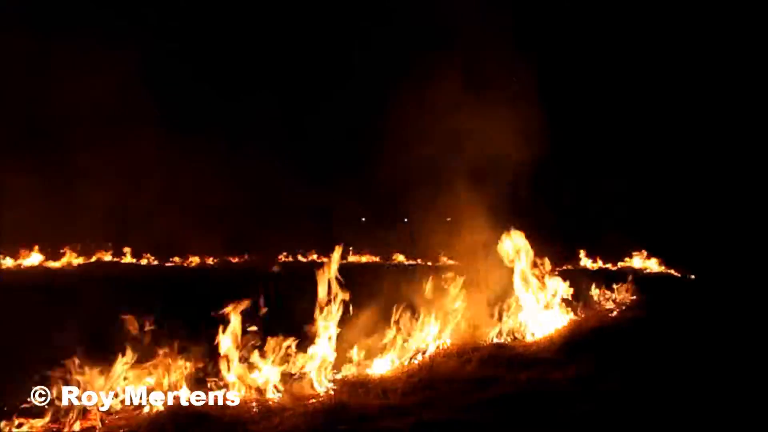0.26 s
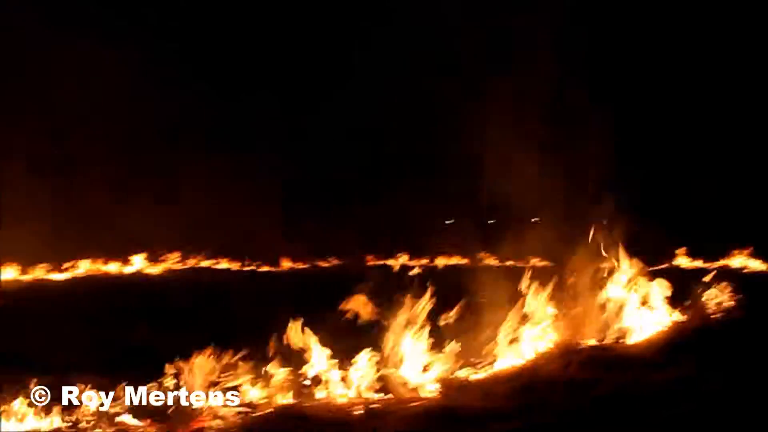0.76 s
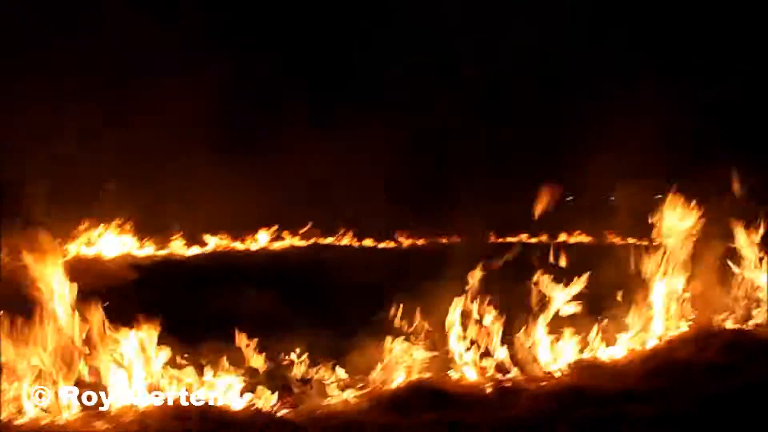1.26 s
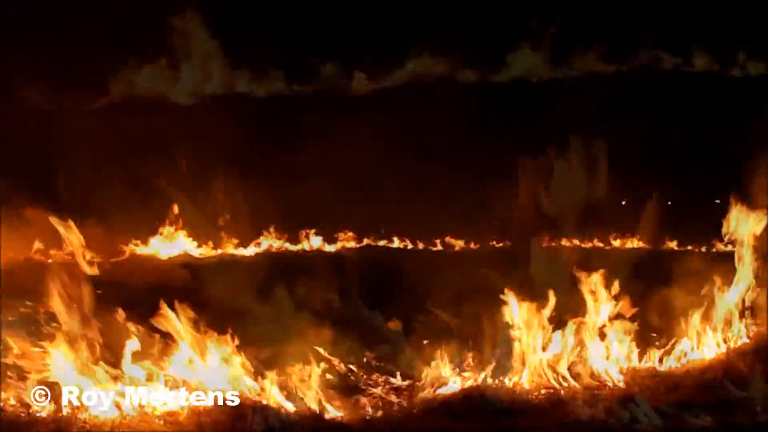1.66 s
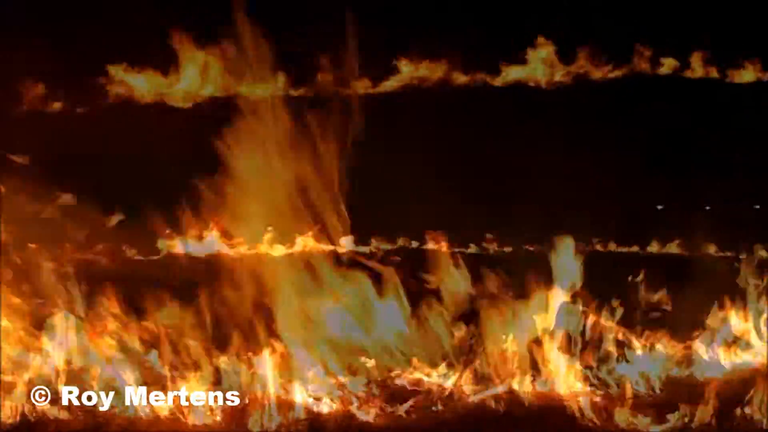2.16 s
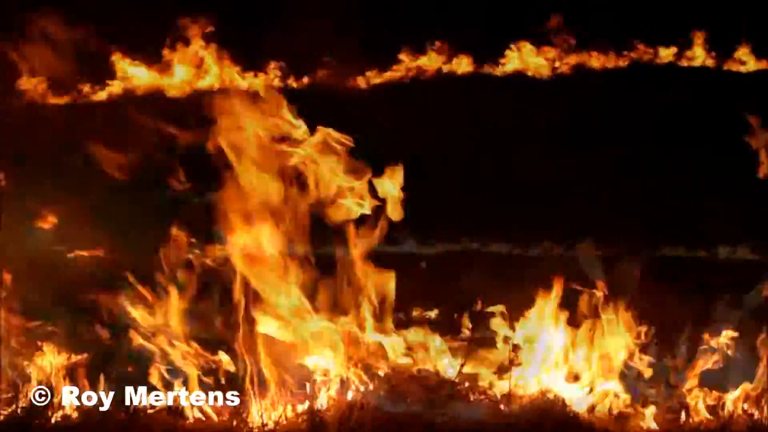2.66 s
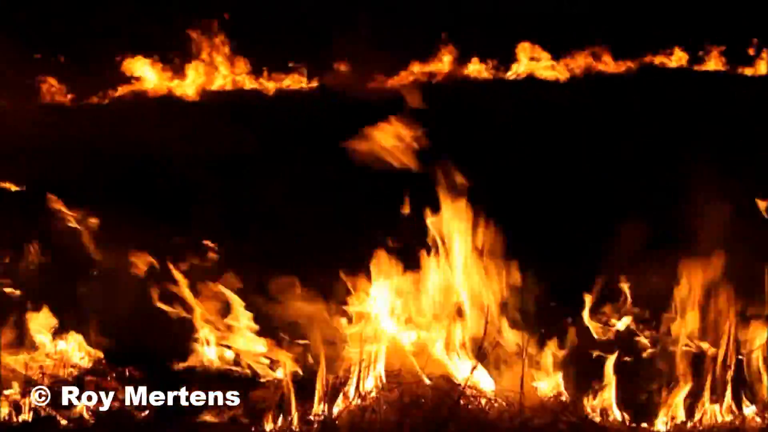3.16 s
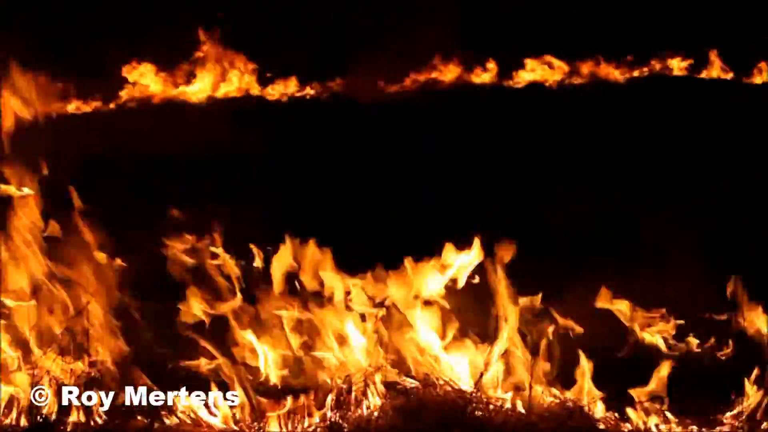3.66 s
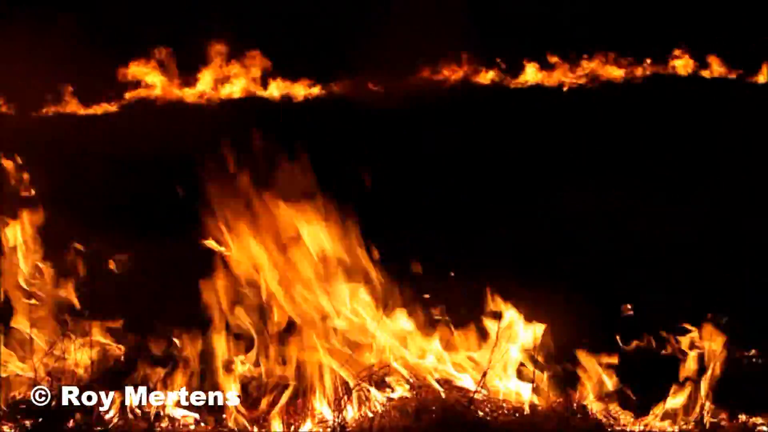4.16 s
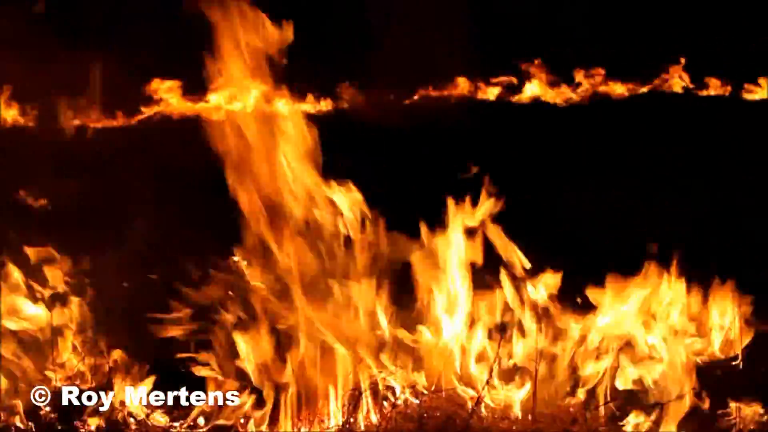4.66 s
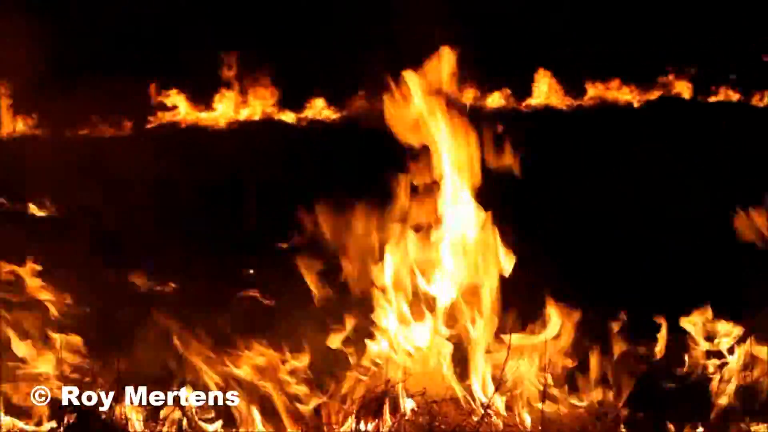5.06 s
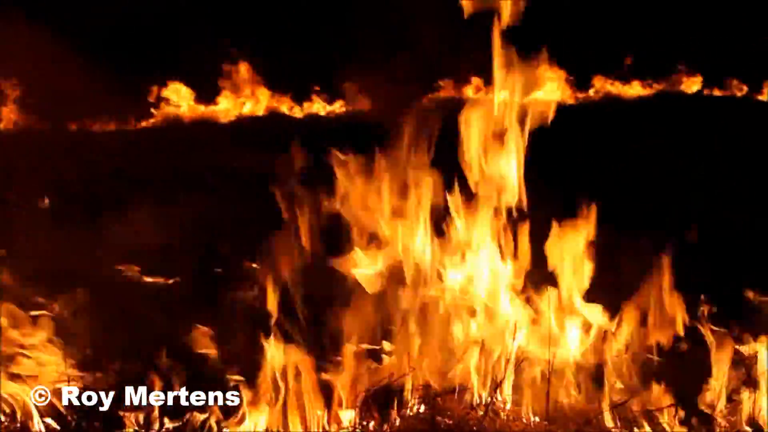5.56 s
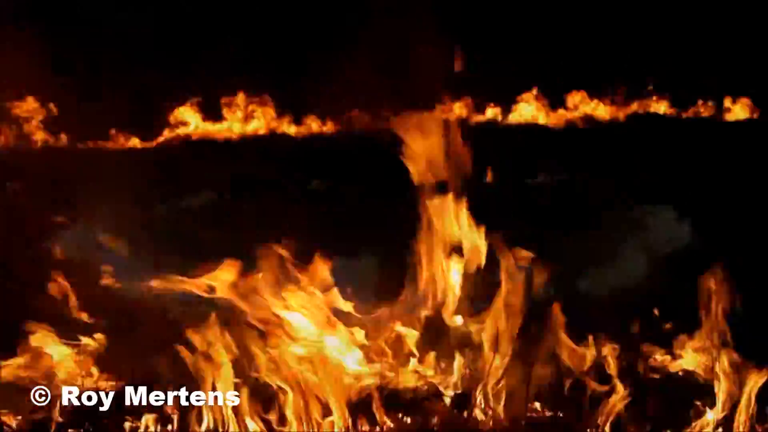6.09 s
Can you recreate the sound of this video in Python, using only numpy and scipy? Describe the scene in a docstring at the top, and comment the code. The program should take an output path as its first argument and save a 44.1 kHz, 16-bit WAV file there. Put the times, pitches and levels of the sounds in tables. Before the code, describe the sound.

A grass fire outdoors at night, heard close and nearly dry. Countless tiny ticks crowd in irregular flurries, with stems bursting as hollow pops and bright splintering snaps. The opening is lighter, the middle dense and fierce, then the sizzle thins while cracks continue. The last fraction of a second jumps up in level, with heavier crackle, a soft puff, rumble and low hum.

```python
"""A dense crackle of small blades opens at once, over the hiss of a far fire line and the low rumble of flames:
dry grass burning in a field, close by. Stems burst over it in sharp cracks that splinter for a few milliseconds.
Breaks are noise tears around a spike, ringing resonances; hiss, rumble and soft puffs are coloured noise.
The strength of the fire drives crackle, hiss and lesser cracks. Near the end the sound cuts to a louder,
deeper-toned view of the fire, with a low, wavering sine hum."""
import sys
import numpy as np
from scipy import signal
from scipy.fft import rfft, irfft, next_fast_len
from scipy.io import wavfile
from scipy.ndimage import map_coordinates

SR = 44100
rng = np.random.default_rng(int(sys.argv[2]) if len(sys.argv) > 2 else 0)


def file_out(sig):
    """Save sig as 16-bit WAV at sys.argv[1]."""
    # one column per channel
    cols = np.atleast_2d(sig).T
    # limit, then scale
    lim = np.clip(cols, -1, 1)
    pcm = np.round(lim * 32767).astype(np.int16)
    wavfile.write(sys.argv[1], SR, pcm)


N = 279153

# strength of the fire, the base level for its layers before the gain of the cut: start_s, level_db
FIRE_STRENGTH = [(0.0, -41.5), (0.46, -42), (0.66, -37.5), (0.82, -41), (1.27, -41), (1.49, -38),
                 (1.505, -31), (1.76, -33), (2.4, -31), (2.88, -29), (3.0, -32.5), (3.7, -34),
                 (4.25, -36.5), (4.66, -36), (4.9, -34), (5.33, -34), (5.8, -39), (6.33, -37.5)]
# colour of the far hiss, relative level per Hz: edge_hz, level_db
HISS_SPECTRUM = [(150, -32), (420, 2.5), (900, -4), (2000, -0.5), (4000, -4), (8000, -7), (12500, -4.5),
                 (16000, -1.5)]
# colour of the flame rumble, relative level per Hz: edge_hz, level_db
RUMBLE_SPECTRUM = [(20, -21), (45, -6), (90, 0), (170, 1), (250, -1.5), (330, -6.5), (430, -5),
                   (700, -10.5), (1200, -22), (4000, -67)]
# draught of the flames, the rumble level before the gain of the cut: start_s, level_db
FLAME_DRAUGHT = [(0.0, -59), (1.4, -58.5), (1.55, -52), (2.85, -47.5), (3.1, -53), (4.25, -54),
                 (4.6, -50.5), (5.5, -53.5), (5.9, -55.5)]
# loudest bursting stems, levels before the trims in bursting():
# start_s, pitch_hz (hollow stem), stem_db, snap_db (bright fracture), tail_db (splinters relative to the burst)
NEAR_STEMS = [(0.0087, 2510, 0.5, -7, -16.5), (0.0265, 625, -0.5, 7.5, -22), (0.1442, 3000, 6, 2.5, -19.5),
              (0.1577, 5200, 4, 1, -3), (0.375, 5330, -1.5, -14, -13), (0.403, 3350, 0, -6, -3),
              (0.5931, 815, 1.5, 1, -5), (0.6167, 2700, 5.5, 6, -19), (0.635, 3170, 0.5, -11, -19),
              (0.7122, 2440, 3.5, 8.5, -22), (0.756, 3530, -5, -3, -5), (0.7916, 3840, -2, -7, -20),
              (0.8305, 5000, 7, 4.5, -33), (1.0598, 720, -0.5, 6.5, -11), (1.099, 2860, -11, -5, -21),
              (1.1759, 540, -2, -5, -16), (1.25, 2510, -2.5, -2.5, -5), (1.3333, 4610, -0.5, -2, -18),
              (1.349, 2630, 5.5, 7.5, -8), (1.505, 646, 2.5, 2, -8), (1.5493, 2520, 3.5, 5, -3),
              (1.5818, 2070, 4.5, 9, -6), (1.639, 1880, 15, 13.5, -23), (1.6968, 900, 9, 16, -28),
              (1.7495, 3460, 2, -11, -9), (1.8191, 4550, 10.5, 0, -12), (1.9, 5000, 4.5, 6.5, -20),
              (1.9909, 2120, -3, 11.5, -24), (2.0052, 5470, 9.5, -2, -11), (2.134, 3320, 5.5, 6, -23),
              (2.1576, 1340, 0, 7, -16), (2.2099, 4190, 10.5, 6.5, -3), (2.249, 640, -14, 11, -20),
              (2.3652, 2200, 6, -8, -15), (2.6013, 2100, 7, 5, 3.5), (2.6134, 1630, 12, -2, -11),
              (2.6609, 3330, 11, 8, -8), (2.6653, 640, 1, 4, -1), (2.706, 1250, 12, 8, -16),
              (2.7227, 2420, 6.5, 5.5, -22), (2.7959, 4040, 7.5, 8, -26), (2.8037, 620, -2, 9, -15),
              (2.9011, 1310, 8.5, 3, 4), (2.9068, 5130, 5, 8, -14), (2.9112, 3830, 11.5, 10, -15),
              (3.047, 820, -1, 7, -3), (3.073, 2930, 5, 7.5, -27), (3.107, 8960, 12.5, 12, -28),
              (3.214, 3510, 7, 4, -24), (3.295, 1440, -8, 7.5, -8), (3.3305, 800, 0, 4.5, 6.5),
              (3.3468, 5340, 11, 3, -11), (3.3922, 3000, 9.5, 6, -19), (3.4585, 540, 1, 15, -24),
              (3.4827, 740, 2, 12.5, -14), (3.518, 770, 9, 12, -14), (3.539, 1450, 20, 3, -14),
              (3.554, 3000, 2, 3, 1), (3.579, 8210, 12.5, 1, -20), (3.6441, 4220, 0.5, 0, -10),
              (3.78, 1630, 4.5, 9, -18), (3.9002, 1040, 13, 6.5, -5), (3.9222, 1730, 3, 8, -16),
              (3.9444, 2830, 7, 9.5, -6), (4.0056, 1920, 5.5, 6.5, -8), (4.0536, 2330, 8, 14.5, -12),
              (4.0684, 1060, 1, 11, -10), (4.073, 830, -1, 7, -16), (4.1095, 1000, -3, 5.5, -21),
              (4.1234, 2400, 10.5, -4, -28), (4.1752, 3040, 4, 5, -4), (4.2469, 1620, 3.5, -20, -17),
              (4.3225, 970, 3, 7, 1.5), (4.355, 2780, -5, 3, -18), (4.372, 2570, 14.5, -19, -29),
              (4.4631, 1900, -1.5, 4.5, -10), (4.5216, 1870, 2.5, 6, 0), (4.5392, 1650, 3, -5, -11),
              (4.6935, 730, -9, 2, -17), (4.7388, 2610, -1, 4, -18), (4.8058, 3400, 7.5, 6.5, -20),
              (4.8288, 5370, 5, 7, -18), (4.8424, 1460, 11.5, 3, -10), (4.8532, 4770, 7, 8.5, -8),
              (4.9324, 2600, 4, 2.5, -17), (4.995, 1200, 5, 0, -2), (5.0649, 7040, 10, 1, -11),
              (5.1249, 2340, 10, -3, -10), (5.2361, 1990, 4.5, 4, -4), (5.283, 1930, 5, 8, -1.5),
              (5.3045, 550, -9, 9.5, -25), (5.3147, 1070, 8, 6, -11), (5.4039, 1900, -2, 3, -20),
              (5.4414, 1940, -0.5, -3, -8), (5.487, 3330, -0.5, 3.5, 3), (5.6188, 910, -6, 4.5, -7),
              (5.654, 1990, 2.5, 0, -21), (5.6974, 1290, -12, 6, -7), (5.7627, 1900, -9, -6, -19),
              (5.8745, 2660, 3, 11.5, -28), (5.9189, 4460, -2.5, -2, -21), (6.0343, 2340, 12.5, 13, -17),
              (6.1223, 2930, 12, -14, -19), (6.1453, 3020, 13.5, -10, -18), (6.196, 1950, 8, 0, 3.5),
              (6.2398, 2420, 10, -5, -20), (6.2612, 2600, 9, -13.5, -16), (6.2864, 3160, 10, 2, -9.5)]
# soft puffs of flaring gas: start_s, edge_hz (upper edge), level_db, length_s
GAS_PUFFS = [(4.56, 845, -39, 0.021), (5.997, 380, -34.5, 0.048)]

TIME = np.arange(N) / SR
TOP_HZ = 16000  # upper band limit
LEAD = SR // 1000  # samples of tearing ahead of each spike, about 1 ms
CUT_S, CUT_FADE_S = 5.995, 0.012  # when the view changes, and the length of the fade into it
CUT_DB, CUT_STALKS_DB, CUT_RUMBLE_DB = 8, 4, 15  # gain of the fire, extra for thick stalks, gain of the rumble
USUAL_DB = -33.5  # strength of the fire that leaves the lesser cracks neither boosted nor cut


def amp(db):
    """Decibels to gain."""
    return 10 ** (np.asarray(db) / 20)


def unit(x):
    """x at rms 1."""
    return x / np.sqrt(np.mean(x ** 2) + 1e-20)


def curve(rows):
    """Straight lines through (start_s, level_db) points, one value per sample."""
    return np.interp(TIME, *np.transpose(rows))


def wobble(rate):
    """A smooth random curve, rate knots a second."""
    return map_coordinates(rng.standard_normal(2048), [TIME * rate], mode="wrap")


def filtered(x, response):
    """x times a response of frequency."""
    size = next_fast_len(N + SR // 2)
    hz = np.fft.rfftfreq(size, 1 / SR)
    return irfft(rfft(x, size) * response(hz), size)[:N]


def noise(spectrum):
    """Noise of rms 1 with the given (edge_hz, level_db) colour."""
    edge_hz, level_db = np.transpose(spectrum)
    colour = lambda hz: amp(np.interp(np.log(hz + 1), np.log(edge_hz), level_db))
    return unit(filtered(rng.standard_normal(N), colour))


def resonance(hz, centre, q):
    """A damped resonance with gain 1 at its centre."""
    return 1j * hz * centre / (q * (centre ** 2 - hz ** 2) + 1j * hz * centre)


def fractures(tail_db, spike_db, tear_s, splinter_s, size=768):
    """One row per break: a tearing that swells to a pressure spike and dies, then sparse splinters."""
    t = (np.arange(size) - LEAD) / SR
    draw = rng.standard_normal((len(tail_db), 2, size))
    norm = lambda rows: rows / np.linalg.norm(rows, axis=1, keepdims=True)
    # the tear swells twice as fast as it dies
    tear = norm(draw[:, 0] * np.exp(np.minimum(2 * t, -t) / tear_s))
    # cubing the noise leaves a few strong grains
    splinters = norm(draw[:, 1] ** 3 * np.maximum(t, 0) * np.exp(-t / splinter_s))
    burst = norm(amp(spike_db) * (t == 0) + tear)
    return burst + amp(tail_db)[:, None] * splinters


def rung(breaks, pitch_hz, q, low_hz):
    """Each break rings its own resonance; so small a source radiates little bass."""
    hz = np.fft.rfftfreq(breaks.shape[1], 1 / SR)
    bass_loss = hz / (hz - 1j * low_hz)
    return irfft(rfft(breaks) * resonance(hz, pitch_hz[:, None], q) * bass_loss)


def placed(times, rows):
    """Rows summed into one track, each with its spike at its time."""
    at = np.round(np.abs(times) * SR).astype(int)[:, None] + np.arange(rows.shape[1])
    return np.bincount(at.ravel(), rows.ravel(), N + LEAD)[LEAD:N + LEAD]


def crackle(blades_db, stalks_db, count=2600):
    """Countless small breaks: separate ticks in a weak fire, a dense sizzle in a strong one."""
    # tufts catch in flurries: breaks crowd together where the running sum climbs fast
    flurry = np.cumsum(amp(0.55 * blades_db + 2.2 * wobble(140)))
    evenly = (np.arange(count) + rng.random(count)) / count
    start_s = np.interp(evenly, flurry / flurry[-1], TIME)
    strength, thickness, pitch, edge = np.clip(rng.standard_normal((4, count)), -2, 1.3)
    breaks = fractures(np.full(count, -7.0), spike_db=-4, tear_s=0.00076, splinter_s=0.001)
    # crowded breaks share the fire's power
    size_db = 6 * strength - 0.24 * np.interp(start_s, TIME, blades_db)
    stalk_rings = rung(breaks, 2700 * np.exp(0.55 * pitch), q=1.3, low_hz=250)
    blade_rings = rung(breaks, 12500 * np.exp(0.37 * edge), q=1.27, low_hz=900)
    stalks = placed(start_s, amp(size_db + 4.5 * thickness)[:, None] * stalk_rings)
    blades = placed(start_s, amp(size_db)[:, None] * blade_rings)
    return amp(stalks_db + 2.5) * unit(stalks) - amp(blades_db + 0.2) * unit(blades)


def hiss(blades_db):
    """The far fire line merges into a seething hiss."""
    return amp(blades_db - 12.0 + 4.1 * wobble(90)) * noise(HISS_SPECTRUM)


def flames(cut):
    """Turbulent flames rumble with their draught, unsteadily, and louder after the cut."""
    rumble_db = curve(FLAME_DRAUGHT) + CUT_RUMBLE_DB * cut
    return amp(rumble_db + 1.84 * wobble(13)) * noise(RUMBLE_SPECTRUM)


def bursting(start_s, pitch_hz, stem_db, snap_db, tail_db):
    """Steam bursts the stems: the hollow pops while the wall tears with a bright snap."""
    # thick stems burst once and splinter little
    slim_db = 6 * np.log2(np.minimum(pitch_hz / 2200, 1))
    bursts = fractures(tail_db + slim_db - 2, spike_db=6, tear_s=0.00048, splinter_s=0.0019)
    tears = fractures(tail_db, spike_db=-9.0, tear_s=0.0005, splinter_s=0.0022)
    snap_hz = 12500 * np.exp(0.047 * rng.standard_normal(len(start_s)))
    stem = amp(stem_db - 2.0)[:, None] * rung(bursts, pitch_hz, q=1.385, low_hz=264)
    snap = amp(snap_db - 2.55)[:, None] * rung(tears, snap_hz, q=1.05, low_hz=500)
    return placed(start_s, stem - snap)


def cracks():
    """The nearest stems burst loudest, each at its listed time."""
    return bursting(*np.transpose(NEAR_STEMS))


def lesser_cracks(blaze_db, pitch_hz, octaves, stem_db, snap_db, tail_db, count=270):
    """Stems further off burst at random, harder in a stronger fire; thick, low ones pop more softly."""
    when, slimness, stem, snap, tail = rng.uniform(-1, 1, (count, 5)).T
    # one burst at a random moment in each equal slot
    start_s = (np.arange(count) + (1 + when) / 2) / count * TIME[-1]
    heat_db = 0.88 * (np.interp(start_s, TIME, blaze_db) - USUAL_DB)
    return bursting(start_s,
                    pitch_hz * 2 ** (octaves * slimness),
                    stem_db + heat_db + 4.4 * slimness + 6.5 * stem,
                    snap_db + heat_db + 5 * snap,
                    tail_db + 9 * tail)


def field(x, db, t60):
    """Ground and standing grass scatter a faint, short tail."""
    t = np.arange(SR // 8) / SR
    tail = rng.standard_normal(len(t)) * amp(-60 * t / t60)
    return x + amp(db) * signal.fftconvolve(x, tail / np.linalg.norm(tail))[:N]


def puffs():
    """Gas flares now and then in a soft puff: dull noise under a half-sine swell."""
    out = np.zeros(N)
    for start_s, edge_hz, level_db, length_s in GAS_PUFFS:
        swell = np.sin(np.pi * np.clip((TIME - start_s) / length_s, 0, 1))
        colour = [(edge_hz / 10, -5), (edge_hz / 2, 0), (edge_hz, -2), (2 * edge_hz, -20), (TOP_HZ, -60)]
        out += amp(level_db) * swell * noise(colour)
    return out


def hum(pitch_hz, db):
    """A low sine hum, slightly wavering in pitch."""
    phase = 2 * np.pi * np.cumsum(pitch_hz * (1 + 0.012 * wobble(9))) / SR
    return amp(db) * unit(np.sin(phase))


def scene():
    """Crackle, hiss, flames, cracks and puffs in the open air, with the hum after the cut."""
    cut = np.clip((TIME - CUT_S) / CUT_FADE_S, 0, 1)
    blaze_db = curve(FIRE_STRENGTH) + CUT_DB * cut
    stalks_db = blaze_db - 8.5 + CUT_STALKS_DB * cut
    far_stems = lesser_cracks(blaze_db, pitch_hz=1900, octaves=2.05, stem_db=-4.5, snap_db=-2.0, tail_db=-16)
    breaking = crackle(blaze_db, stalks_db) + cracks() + far_stems
    burning = field(breaking, db=-15.0, t60=0.018)
    fire = burning + hiss(blaze_db) + flames(cut) + puffs()
    return (fire + cut * hum(pitch_hz=62.4, db=-41.0))[None]


def record(dry):
    """The recorder keeps nothing above its band limit."""
    return filtered(dry[0], lambda hz: hz < TOP_HZ)[None]


dry = scene()
out = record(dry)
file_out(out)
```